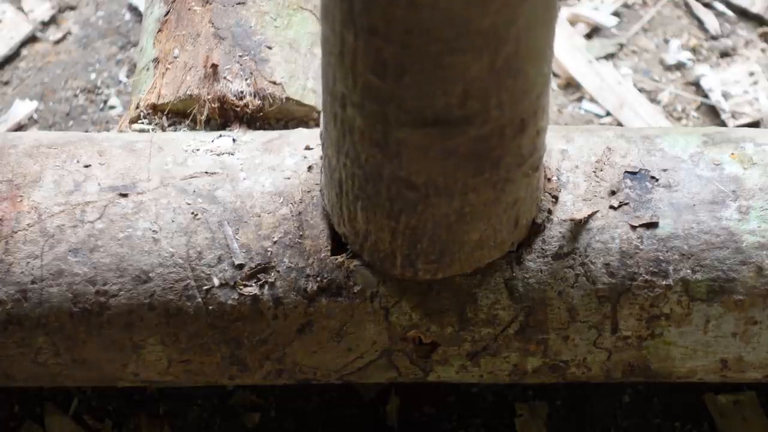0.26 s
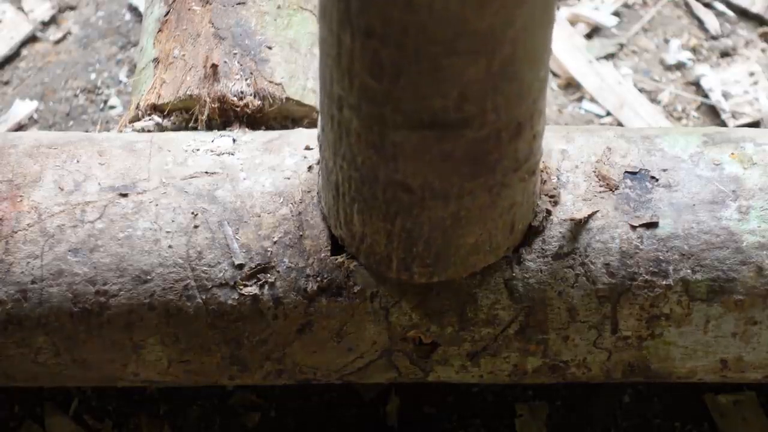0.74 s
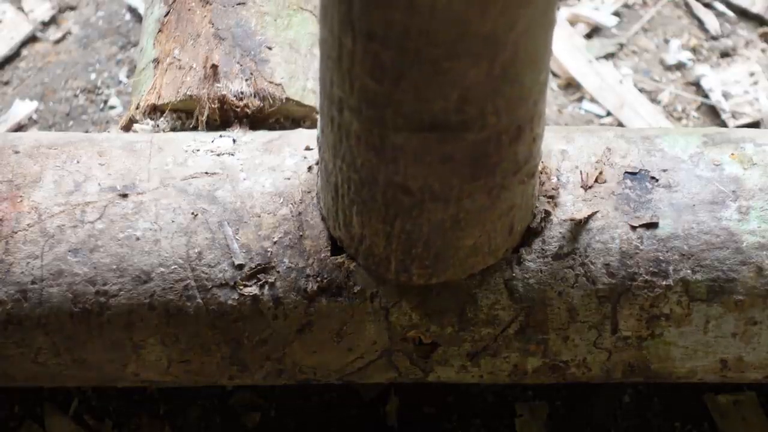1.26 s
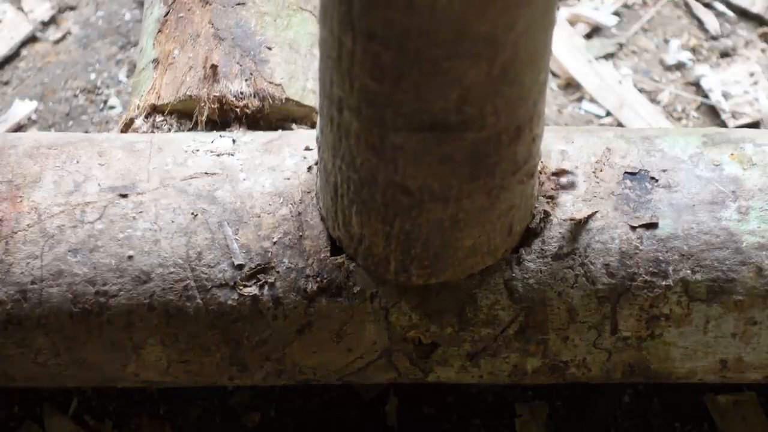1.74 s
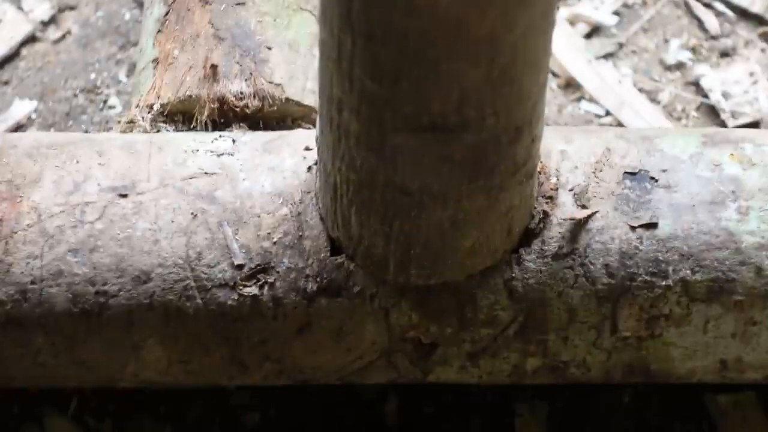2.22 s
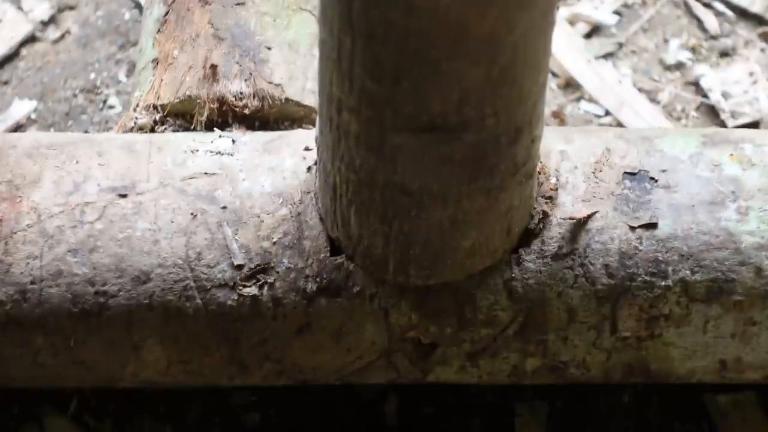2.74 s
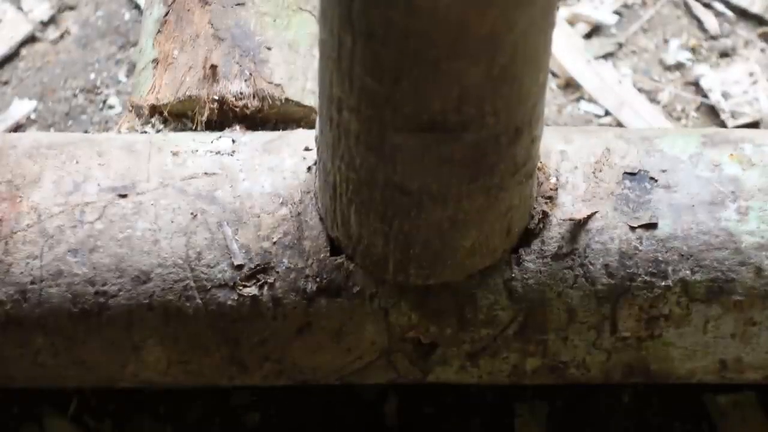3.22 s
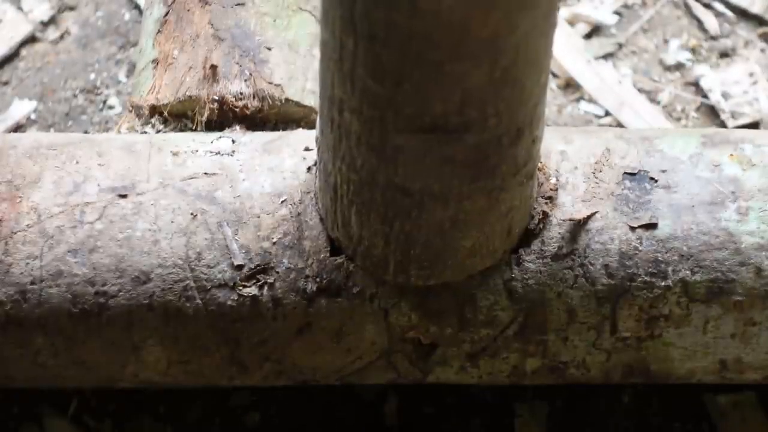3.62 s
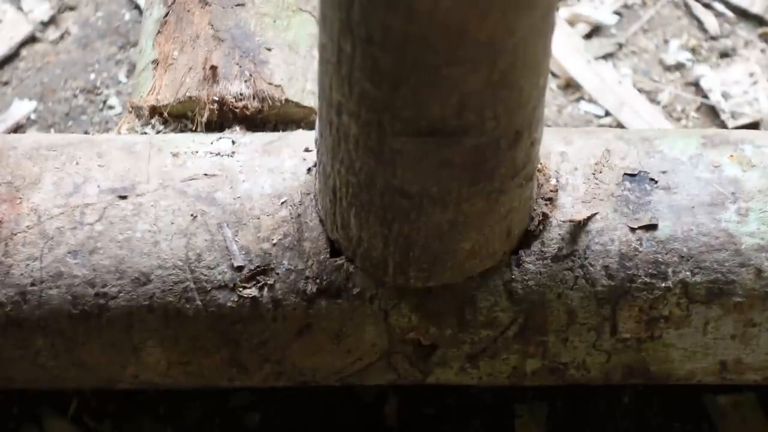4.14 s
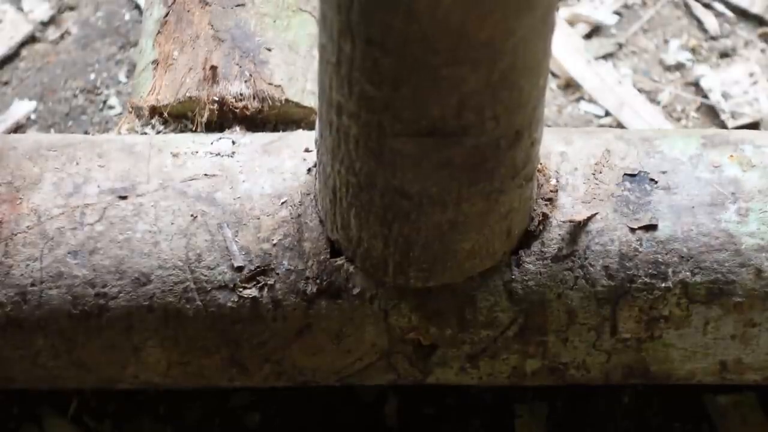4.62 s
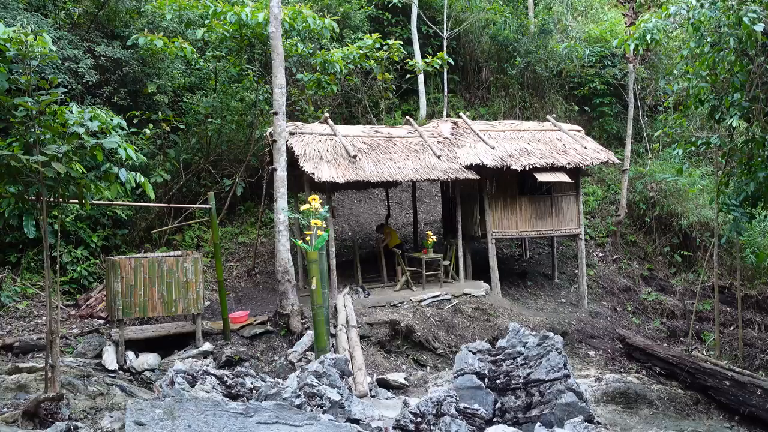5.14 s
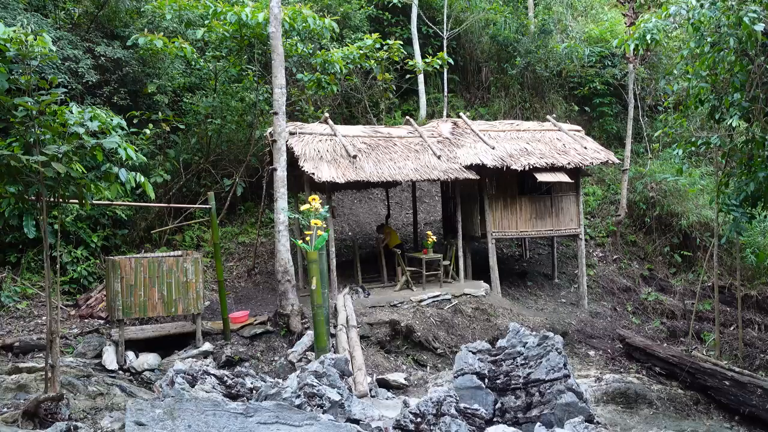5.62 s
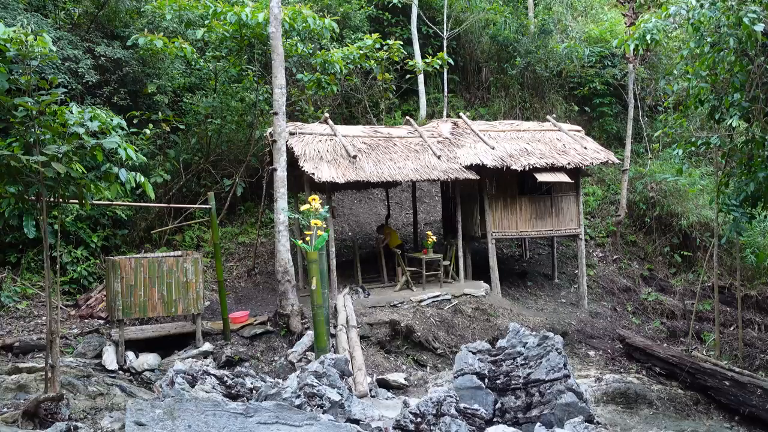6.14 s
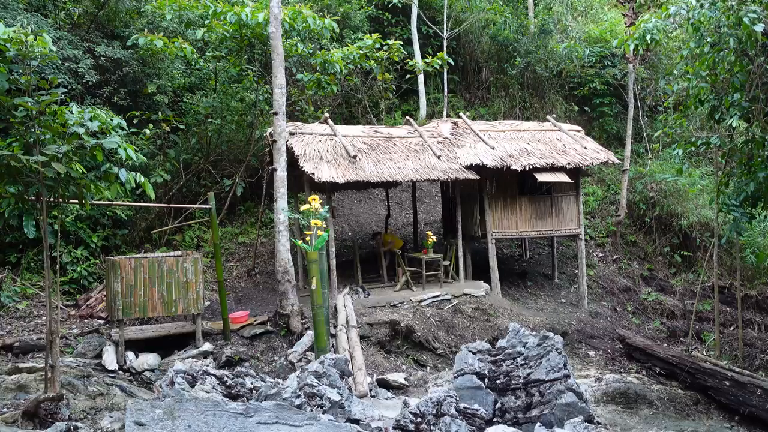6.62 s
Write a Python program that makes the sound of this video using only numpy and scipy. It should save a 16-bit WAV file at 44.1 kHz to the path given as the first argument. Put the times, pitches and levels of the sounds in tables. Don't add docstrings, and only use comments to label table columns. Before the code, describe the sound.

Outdoors in a forest, close stereo microphone: quiet wood handling over an insect and stream hiss, then seven regular hammer knocks, the third weakest and brightest, the fourth hardest, with chattering joint, brief ringing post and tree echoes. After the last, loose wood clacks lightly. An abrupt change brings a farther perspective without hammering, where a piercing cicada drones, another insect buzzes and water drips faintly.

```python
import sys
import numpy as np
from scipy import signal
from scipy.fft import rfft, irfft
from scipy.io import wavfile
from scipy.ndimage import uniform_filter1d

SR = 44100
rng = np.random.default_rng(int(sys.argv[2]) if len(sys.argv) > 2 else 0)


def convert_level_to_amplitude(level_db):
    exponent = np.asarray(level_db, float) / 20
    return 10 ** exponent


def wav_record(signal):
    frames = np.transpose(np.atleast_2d(signal))
    bounded = np.clip(frames, -1, 1)
    quanta = np.round(bounded * 32767).astype(np.int16)
    wavfile.write(sys.argv[1], SR, quanta)


N = 302967
CHANGE_S = 4.768


def evened(x):
    return x / np.sqrt(np.mean(x ** 2) + 1e-20)


def read(points, hz):
    f, value = np.transpose(points)
    return np.interp(np.log(hz + 1), np.log(f + 1), value)


def add(mix, start_s, sound):
    part = mix[:, round(start_s * SR):][:, :sound.shape[1]]
    part += sound[:, :part.shape[1]]


def panned(x, left_right_db):
    return x * convert_level_to_amplitude(np.array([[left_right_db / 2], [-left_right_db / 2]]))


def ring(hz, t60_s, t):
    return np.sin(2 * np.pi * hz * t) * convert_level_to_amplitude(-60 * t / t60_s)


def rung_modes(modes, t):
    return sum(convert_level_to_amplitude(db) * ring(hz, np.log(1000) / np.pi / width_hz, t) for hz, width_hz, db in modes)


def coloured(x, points):
    return irfft(rfft(x) * convert_level_to_amplitude(read(points, np.fft.rfftfreq(x.shape[-1], 1 / SR))), x.shape[-1])


def high_passed(x, hz, order):
    return signal.sosfilt(signal.butter(order, hz, "high", fs=SR, output="sos"), x)


def echoes(decays, seconds, gap_s):
    hz, t, z = signal.stft(rng.standard_normal((2, SR)), SR, nperseg=256)
    fading = z * convert_level_to_amplitude(-60 * t / read(decays, hz)[:, None])
    tail = signal.istft(fading, SR, nperseg=256)[1][:, :round(seconds * SR)]
    tail = tail * np.clip(np.arange(tail.shape[1]) / SR / gap_s, 0, 1)
    return tail / np.linalg.norm(tail[0])


def echoed(mono, tail):
    wet = signal.fftconvolve(mono[None], tail, axes=1)[:, :N]
    return wet + .5 * wet[::-1]


# pitch_hz, spread_db
UNEVENNESS = [(300, 2.6), (1400, 2.8), (2500, 1.7), (8000, 1.7)]


def hiss(shape, level, same, side, bands, patchy, flicker_db):
    frames, hz = N // 128 + 5, np.fft.rfftfreq(512, 1 / SR)
    a, b, c, d, patches = rng.standard_normal((frames, 257, 5)).T
    patches = uniform_filter1d(uniform_filter1d(patches, size=7, axis=0), size=16, axis=1)
    patches = evened(patches)
    flicker = evened(uniform_filter1d(rng.standard_normal(frames), size=5))
    colour = convert_level_to_amplitude(2 * read(shape, hz))
    for f, width_hz, db in bands:
        colour = colour * (1 + convert_level_to_amplitude(2 * db) / (1 + ((hz - f) / width_hz) ** 2))

    start_s, *columns = np.transpose(level)
    t, gains = np.arange(frames) * 128 / SR, []
    for column, (low_hz, high_hz) in zip(columns, [(300, 1400), (2000, 5500), (6200, 8000)]):
        power = colour[(hz > low_hz) & (hz < high_hz)].sum()
        gains.append(np.interp(t, start_s, column) - 10 * np.log10(power))
    centres_hz = [1020, 2400, 5400, 7520]
    shares = np.eye(3)[[0, 1, 1, 2]].T
    weights = np.array([read(list(zip(centres_hz, share)), hz) for share in shares])
    db = weights.T @ np.array(gains)
    db = db + patchy * read(UNEVENNESS, hz)[:, None] * patches + flicker_db * flicker

    like = np.clip(read(same, hz), -1, 1)[:, None]
    left = a + 1j * b
    right = like * left + np.sqrt(1 - like ** 2) * (c + 1j * d)
    z = np.array([left, right])
    z = z * convert_level_to_amplitude(np.array([.5, -.5])[:, None, None] * read(side, hz)[:, None])
    z = z * np.sqrt(colour)[:, None] * convert_level_to_amplitude(db)
    return signal.istft(z, nperseg=512, noverlap=384)[1][:, :N] * convert_level_to_amplitude(1.0)


def after_blows(t, delay_s):
    u = np.maximum(t[:, None] - np.transpose(BLOWS)[0], 0) / delay_s
    return (u * np.exp(1 - u)).sum(axis=1)


# pitch_hz, level_db (per Hz)
NEAR_COLOUR = [(24, -84.5), (40, -34.5), (159, -31), (237, -25.5), (290, -23.5), (630, -15.5), (810, -6),
               (1070, -11.5), (1590, -5.5), (2100, -4), (2630, 0), (7000, -6), (9940, -29), (14100, -41),
               (16000, -43.5)]
# pitch_hz, likeness (0-1)
NEAR_LIKENESS = [(60, 0.88), (240, 0.54), (950, 0.55), (3770, 0.69), (15000, 0.18)]
# pitch_hz, left_right_db
NEAR_BALANCE = [(60, -8.5), (240, -1.5), (950, -6.5), (3770, 0.5), (15000, -3)]
# pitch_hz, width_hz, level_db
CHORUS_BANDS = [(850, 70, 0), (2620, 90, -2), (3300, 130, -4), (4850, 100, 2), (6950, 240, 0)]


def near_hiss():
    t = np.linspace(0, N / SR, num=400)
    shaken_s, pickup_s, dip_s = 0.27, 0.12, 0.091
    rustle_db = -59.5 + 1.5 * after_blows(t, shaken_s) + 8 * np.exp(-t / pickup_s)
    dip = after_blows(t, dip_s)
    stream_db = -41 + 0.23 * t - 0.9 * dip
    insects_db = -42.5 - 0.73 * dip
    levels = np.transpose([t, rustle_db, stream_db, insects_db])
    return hiss(NEAR_COLOUR, levels, NEAR_LIKENESS, NEAR_BALANCE, CHORUS_BANDS, patchy=0.91, flicker_db=0.45)


def singer(modes, level_db):
    body = rung_modes(modes, np.arange(1500) / SR)
    clicks_per_s = 900
    clicks = rng.standard_normal((3, N)) * (rng.random((3, N)) < clicks_per_s / SR)
    stereo = clicks[0] + 0.64 * clicks[1:]
    song = signal.oaconvolve(stereo, body[None], axes=1)[:, :N]
    return evened(high_passed(song, 1500, order=4)) * convert_level_to_amplitude(level_db)


# pitch_hz, width_hz, level_db
KATYDID_MODES = [(3350, 130, 7), (4830, 52, 2)]


def katydid():
    phrase_s, first_phrase_s = 0.79, 0.28
    turns = (np.arange(N) / SR - first_phrase_s) / phrase_s
    return singer(KATYDID_MODES, -54 - 5.5 * np.cos(2 * np.pi * turns))


# start_s, peak_db, pitch_hz, hollow (low part, 0-1)
HANDLING = [(0.119, -40, 980, 0.4), (0.166, -33, 1300, 0.04), (0.409, -53, 1440, 0.1),
            (0.549, -35, 1740, 0), (1.115, -34, 1470, 0.1), (1.586, -47, 1650, 0.2),
            (2.013, -40.5, 830, 0.04), (2.553, -44, 1230, 0.3), (3.004, -32, 797, 0.34),
            (3.102, -33.5, 1710, 0.23), (3.154, -41, 790, 0), (3.429, -34, 910, 0.1), (3.662, -38, 1610, 0),
            (3.703, -34, 785, 0.2), (3.715, -33, 1590, 0.1), (3.74, -39, 1620, 0.05), (3.552, -42, 546, 0),
            (3.889, -38.5, 800, 0), (3.987, -35, 885, 0), (4.064, -39, 1660, 0), (4.251, -41, 1540, 0.43),
            (4.309, -38.5, 904, 0.13), (4.348, -42.5, 910, 0.2), (4.407, -49, 1720, 0.4),
            (4.449, -40, 1490, 0.17), (4.639, -37.5, 840, 0), (4.708, -42, 880, 0.1),
            (4.752, -42.5, 840, 1)]


def handling_knocks():
    out, t = np.zeros((2, N)), np.arange(4000) / SR
    t60_s, bright = 0.055, 0.33
    for start_s, peak_db, hz, hollow in HANDLING:
        rattle = rng.standard_normal(900) * np.exp(-np.arange(900) / 160)
        low = .3 * ring(386, t60_s, t) + ring(540, t60_s, t) + ring(695, t60_s, t) + ring(1040, t60_s, t)
        high = ring(1590, t60_s, t) + ring(2200, t60_s, t)
        body = ring(hz, t60_s, t) + hollow * low + bright * high
        knock = high_passed(signal.fftconvolve(rattle, body), 470, order=4)
        add(out, start_s, panned(convert_level_to_amplitude(peak_db - 3.5) * knock / abs(knock).max(), -4.5))
    return out


# pitch_hz, level_db, t60_s
JOINT_MODES = [(844, -30, 0.12), (1008, -9.5, 0.031), (1300, 8.5, 0.0085), (1540, -4.5, 0.031),
               (1648, -9, .04), (1900, -20.5, 0.045), (1861, 0.5, 0.01), (1946, 0, 0.017),
               (2120, -5, 0.013), (2256, 2.5, 0.017), (2420, -6, 0.013), (2690, -4, 0.013),
               (3066, -14, .03), (4180, -11, 0.026), (5130, -30.5, 0.011)]
# pitch_hz, level_db, rise_s
POST_MODES = [(263.3, -27.5, 0.037), (397, -15.5, 0.037), (479.6, -19.5, 0.021), (755.7, -5.5, 0.014),
              (992, -9.5, 0.0062), (1078, -7, .008), (1190, -4, 0.0032)]
# pitch_hz, level_db (per Hz)
SPLINTER_COLOUR = [(200, -20.5), (400, -9.5), (600, -18.5), (760, -5), (1200, -3), (2300, -17.5),
                   (4300, -13), (6400, -19), (9000, -25), (12000, -40.5), (16000, -55.5)]
# pitch_hz, level_db
CRUSHED_COLOUR = [(3000, 0), (8000, -7.5), (16000, 8.5)]


def chattering_joint(t, sliding, upper_db):
    jolts = rng.standard_normal((2, len(t))) * (rng.random(len(t)) < 6000 / SR) * sliding
    jolts[1] = 0.8 * jolts[0] + .5 * jolts[1]
    jolts = signal.sosfilt(signal.butter(2, 6000, fs=SR, output="sos"), jolts)
    first_hit = np.arange(len(t)) == 0
    drive = 0.26 * jolts * convert_level_to_amplitude(-60 * t / 0.45) + 0.36 * first_hit
    body = sum(convert_level_to_amplitude(db + upper_db * (hz > 1500)) * ring(hz, t60_s, t) for hz, db, t60_s in JOINT_MODES)
    return high_passed(signal.fftconvolve(drive, body[None], axes=1)[:, :len(t)], 623, order=6)


def ringing_post(t, peak_db, ring_db, chatter_s, off_centre_db):
    low_db = ring_db + 0.24 * (ring_db + 11.5)
    follow_db = 0.4 * (ring_db + 7.0)
    bend_db = -14 + follow_db - off_centre_db
    twist_db = -19 + follow_db + off_centre_db
    extras = np.array([low_db, low_db, low_db, ring_db, bend_db, twist_db, twist_db]) - peak_db
    post, chances = np.zeros(len(t)), rng.random((len(POST_MODES), 2))
    for (hz, db, rise_s), extra_db, (turn, detune) in zip(POST_MODES, extras, chances):
        swell = (1 - np.exp(-t / rise_s)) * convert_level_to_amplitude(db + extra_db)
        post += swell * np.sin(2 * np.pi * (hz * (1 + .02 * (detune - .5)) * t + turn))
    return post * convert_level_to_amplitude(-60 * np.maximum(t - chatter_s + 0.0061, 0) / 0.056 - 60 * t / .5)


def cracking_fibres(t):
    snap = 1.77 * convert_level_to_amplitude(-60 * t / 0.008)
    crush = (t / 0.022) * np.exp(1 - t / 0.018)
    noise = rng.standard_normal((3, len(t)))
    grain = evened(coloured(noise[0] + .5 * noise[1:], SPLINTER_COLOUR))
    u = t / 0.00013
    push = -convert_level_to_amplitude(0.5 + 8.5) * (1 - u / 2) * u * np.exp(1 - u)
    return high_passed(push + grain * snap + 0.97 * coloured(grain, CRUSHED_COLOUR) * crush, 250, order=3)


def blow(peak_db, ring_db, upper_db, chatter_s, off_centre_db):
    t = np.arange(round(.4 * SR)) / SR
    sliding = convert_level_to_amplitude(-60 * np.maximum(t - chatter_s, 0) / 0.13)
    joint = chattering_joint(t, sliding, upper_db)
    post = ringing_post(t, peak_db, ring_db, chatter_s, off_centre_db)
    crack_db = -14 - peak_db + 0.084 * (peak_db + 7)
    place = convert_level_to_amplitude(peak_db + np.array([[-1.4], [1.4]]))
    knock = convert_level_to_amplitude(-10.0) * joint + convert_level_to_amplitude(crack_db - 8.5) * cracking_fibres(t)
    return place * knock, place * convert_level_to_amplitude(-0.5) * post


# pitch_hz, level_db
SOIL_COLOUR = [(30, -11.5), (70, -9), (160, 0.5), (300, -33.5)]


def landing_thud(thud_db, hz):
    t = np.arange(12000) / SR
    thud = convert_level_to_amplitude(thud_db) * np.sin(2 * np.pi * hz * t) * (t / 0.06) ** 2 * np.exp(2 - 2 * t / 0.044)
    rumble = evened(coloured(rng.standard_normal(len(t)), SOIL_COLOUR))
    rumble = convert_level_to_amplitude(-63.0) * rumble * (t / 0.016) * np.exp(1 - t / 0.031)
    return panned(thud + rumble, 0)


# start_s, force_db, post_ring_db, joint_brightness_db, chatter_s
BLOWS = [
    (0.206, -14.5, -17, -3, 0.036),
    (0.711, -16, -13, -1.5, 0.038),
    (1.211, -20.5, -14.5, 8.5, 0.046),
    (1.7184, -13, -10, -0.5, 0.031),
    (2.1965, -13.5, -9.5, 1, 0.039),
    (2.6771, -13.5, -11, -1.5, 0.058),
    (3.1934, -13.5, -12.5, -2, 0.06),
]
# start_s, thud_db, pitch_hz, off_centre_db (of the blow)
LANDINGS = [
    (0.211, -46.5, 118, 4.5),
    (0.713, -80, 142, -4),
    (1.215, -70, 160, -3),
    (1.717, -48.5, 119.6, 3),
    (2.199, -51.5, 154, 2),
    (2.682, -47, 127.6, 2),
    (3.202, -47, 123, -1),
]
# pitch_hz, t60_s
TREE_ECHO = [(100, 0.34), (400, 0.7), (1000, 0.54), (2500, 0.66), (6000, 0.63), (14000, 0.95)]


def hammering():
    dry, sent = np.zeros((2, N)), np.zeros((2, N))
    for (start_s, *strike), (land_s, thud_db, hz, off_centre_db) in zip(BLOWS, LANDINGS):
        knock, tone = blow(*strike, off_centre_db)
        add(dry, start_s, knock + tone)
        add(sent, start_s, knock + .4 * tone)
        add(dry, land_s, landing_thud(thud_db, hz))
    return dry + convert_level_to_amplitude(-11.5) * echoed(sent.mean(0), echoes(TREE_ECHO, .7, gap_s=0.027))


# start_s, peak_db, left_right_db
TWIG_TICKS = [
    (1.0564, -61, 9.5),
    (1.586, -46, -10.5),
    (3.2144, -50, 6.5),
    (3.4214, -43.5, -4),
    (3.4887, -49.5, 4),
    (3.9143, -42, -6),
    (4.6392, -42, 3),
    (4.7412, -43.5, -10),
]
# pitch_hz, level_db
TWIG_COLOUR = [(1500, -24), (3000, 1), (6000, -2), (9000, -10.5), (13000, -27.5), (16000, -37)]


def twig_ticks():
    out, t = np.zeros((2, N)), np.arange(4000) / SR
    for start_s, peak_db, left_right_db in TWIG_TICKS:
        snap = evened(coloured(rng.standard_normal(len(t)), TWIG_COLOUR)) * convert_level_to_amplitude(-60 * t / 0.15)
        add(out, start_s, panned(convert_level_to_amplitude(peak_db + 2.5) * high_passed(snap, 1200, order=2), left_right_db))
    return out


# start_s, end_s, pitch_hz, level_db
GROAN = (4.18, 4.256, 240, -63)


def log_groan():
    out = np.zeros((2, N))
    start_s, end_s, hz, db = GROAN
    t = np.arange(0, end_s - start_s, 1 / SR)
    tone = convert_level_to_amplitude(db) * np.sin(2 * np.pi * hz * t) * signal.windows.tukey(len(t), .3)
    add(out, start_s, panned(tone, 0))
    return out


# pitch_hz, level_db (per Hz)
FAR_COLOUR = [(40, -61), (130, -45), (190, -48), (810, -26.5), (1300, -28.5), (2320, -20), (4130, -19),
              (5720, -25), (6900, 1.5), (8000, -6), (9000, -18.5), (10800, -29), (12200, -36), (13500, -35),
              (16000, -43)]
# pitch_hz, likeness (0-1)
FAR_LIKENESS = [(60, 0.43), (240, 0.2), (950, 0.38), (3770, 0.71), (15000, 0.48)]
# pitch_hz, left_right_db
FAR_BALANCE = [(60, 0.0), (240, 0.5), (950, -3.5), (3770, 2), (15000, -2)]


def far_hiss():
    levels = [(s, -63.5, -47 + 1.4 * (s - CHANGE_S), -46.5) for s in (CHANGE_S, N / SR)]
    bands = [(2200, 210, -3.5)]  # pitch_hz, width_hz, level_db
    return hiss(FAR_COLOUR, levels, FAR_LIKENESS, FAR_BALANCE, bands, patchy=0.58, flicker_db=0.3)


# place (0-1 of the stroke), level_db
RIB_CLICKS = [
    (0.087, -17.5),
    (0.22, -13),
    (.345, -10.5),
    (0.476, -8.5),
]
# pitch_hz, width_hz, level_db
TYMBAL_MODES = [(6764, 123, -8), (7050, 354, 4), (6120, 570, -25), (7320, 530, 2.5), (8100, 800, -33),
                (13500, 500, -44)]


def cicada():
    strokes_per_s, period_s, fine = 53.4, 1 / 6762, 4
    strokes = np.arange(round(CHANGE_S * strokes_per_s), int(N / SR * strokes_per_s))
    place, click_db = np.transpose(RIB_CLICKS)
    chance = rng.standard_normal((len(strokes), len(RIB_CLICKS), 3))
    s = (strokes[:, None] + place - .03 + 0.013 * chance[..., 0]) / strokes_per_s
    s = (np.round(s / period_s) + .22 * chance[..., 1]) * period_s
    train = np.zeros(fine * N)
    train[np.round(s.ravel() * fine * SR).astype(int)] = convert_level_to_amplitude(click_db + 2.4 * chance[..., 2]).ravel()
    t = np.arange(1600) / SR / fine
    onset = np.sin(np.pi / 2 * np.minimum(t / 0.0022, 1)) ** 2
    click = rung_modes(TYMBAL_MODES, t) * onset
    song = signal.oaconvolve(train, click)[:fine * N:fine]
    tail = echoes([(6000, 0.11), (8000, 0.23)], .3, gap_s=0.012)
    both = panned(song, 2.5) + convert_level_to_amplitude(-7.5) * echoed(song, tail)
    swell_db = -43 + 0.6 * (np.arange(N) / SR - CHANGE_S)
    return both / np.std(both[:, -SR:]) * convert_level_to_amplitude(swell_db)


# pitch_hz, width_hz, level_db
BUZZER_MODES = [(2330, 230, -3), (4440, 400, -1.5)]


def far_buzzer():
    return singer(BUZZER_MODES, -60 + 5.5 * (np.arange(N) / SR - CHANGE_S))


# pitch_hz, width_hz, level_db
LOW_HUM = (130, 17, -94)


def drone():
    hz, width_hz, db = LOW_HUM
    band = [(hz - width_hz, -40), (hz, 0), (hz + width_hz, -40)]
    return convert_level_to_amplitude(db) * evened(coloured(rng.standard_normal(N), band))


# start_s, peak_db, pitch_hz, t60_s, left_right_db
DROPS = [(4.8918, -32, 3230, 0.027, 0.5), (5.0649, -24, 4330, 0.01, 0.5), (5.2744, -35, 2400, 0.015, 0.5),
         (5.3537, -29, 3120, 0.017, 1.0), (5.3722, -29, 2120, 0.017, 1.0), (5.5644, -37, 2310, 0.015, 0.91),
         (5.62, -31, 2310, 0.013, 0.5), (5.759, -33, 1960, 0.013, 1.5), (5.9894, -35, 3500, 0.015, 1.0),
         (6.3969, -26, 2240, 0.013, 1.5), (6.4935, -27, 2190, 0.02, 1.5), (6.654, -24, 2250, 0.012, 2.0)]


def drips():
    out, t = np.zeros((2, N)), np.arange(2000) / SR
    for start_s, peak_db, hz, t60_s, left_right_db in DROPS:
        bubble = ring(hz * (1 + 4 * t), t60_s, t) * np.minimum(t / 0.00099, 1)
        add(out, start_s, panned(convert_level_to_amplitude(peak_db - 5.5) * bubble, left_right_db))
    return out


def scene():
    after = np.clip((np.arange(N) / SR - CHANGE_S) / 0.0029, 0, 1)
    before = 1 - after
    floor = high_passed(near_hiss() * before + far_hiss() * after, 130, order=2)
    by_log = katydid() + handling_knocks() + hammering() + twig_ticks() + log_groan()
    wider = cicada() + far_buzzer() + drone() + drips()
    return floor + by_log * before + wider * after


def roll_off(x):
    return signal.sosfilt(signal.butter(12, 15700, fs=SR, output="sos"), x)


def record(dry):
    ceiling = .62
    rounded = dry / (1 + (dry / ceiling) ** 4) ** .25
    without_bass = high_passed(rounded, 50, order=2)
    band = signal.sosfilt(signal.butter(8, 15300, fs=SR, output="sos"), without_bass)
    ending = np.clip((N - np.arange(N)) / SR / .001, 0, 1)
    return roll_off(band * ending)


dry = scene()
out = record(dry)
wav_record(out)
```